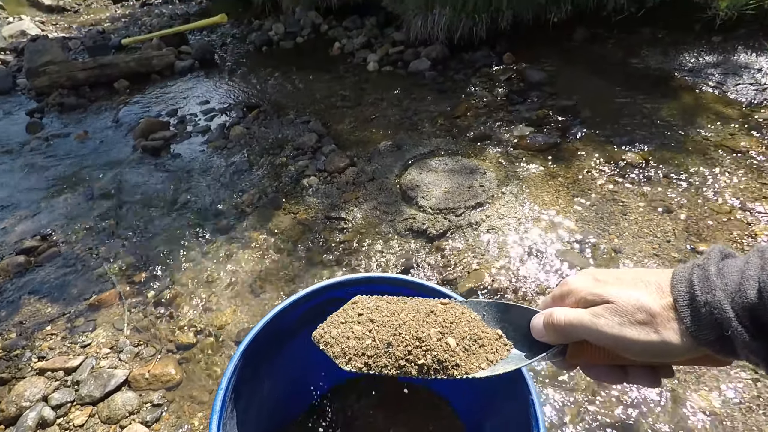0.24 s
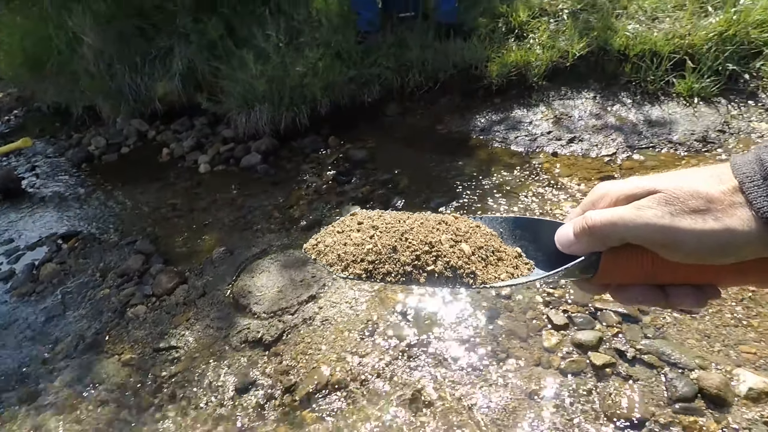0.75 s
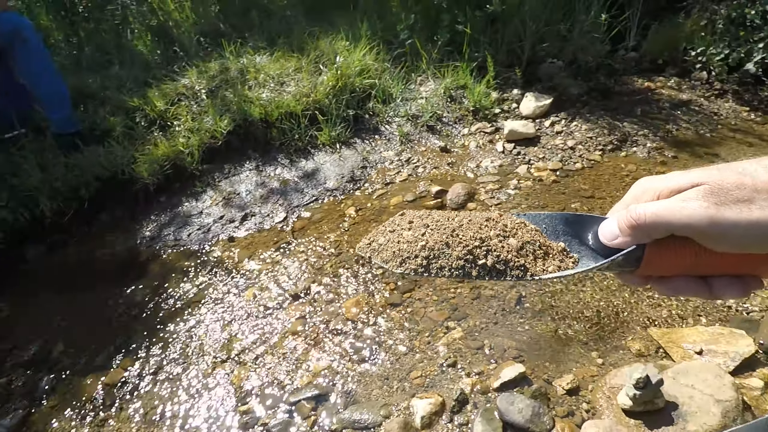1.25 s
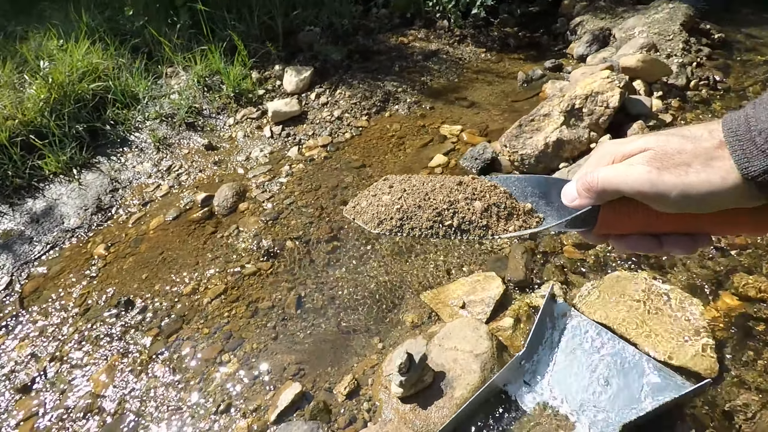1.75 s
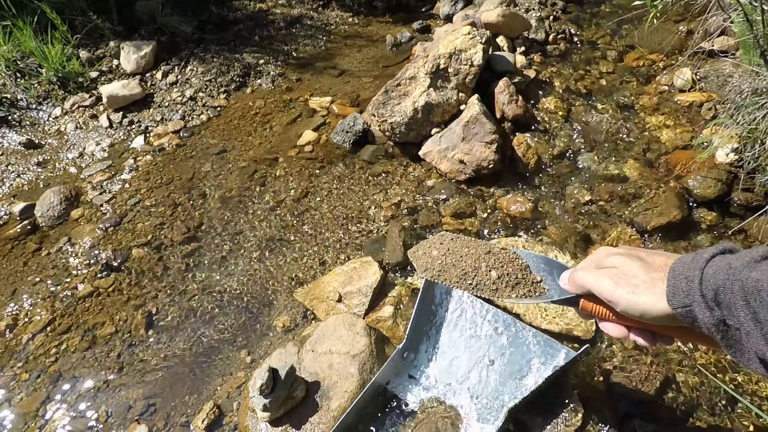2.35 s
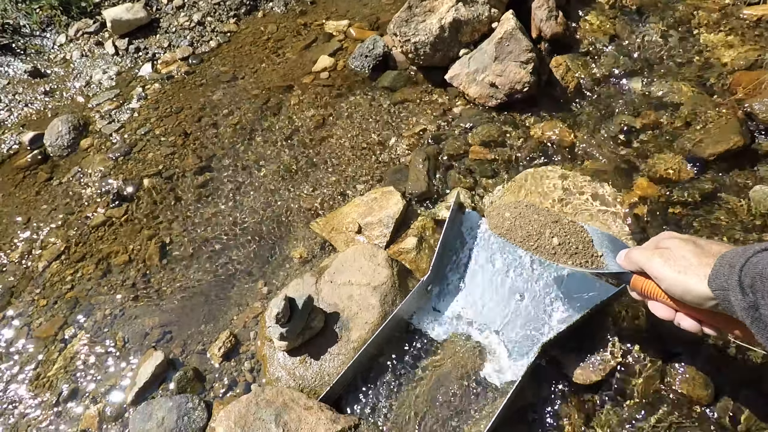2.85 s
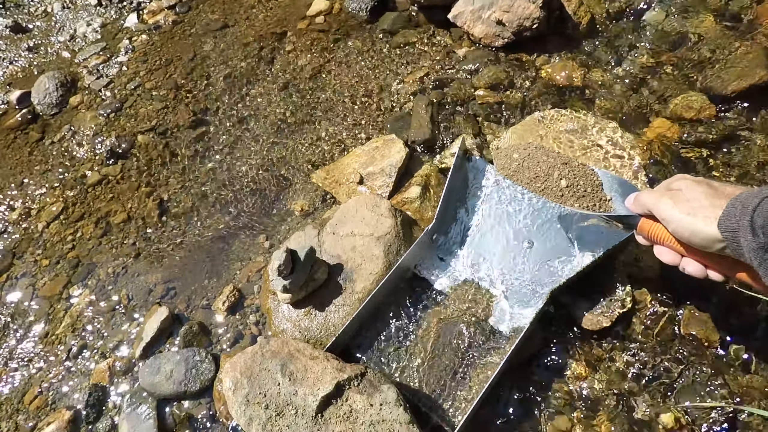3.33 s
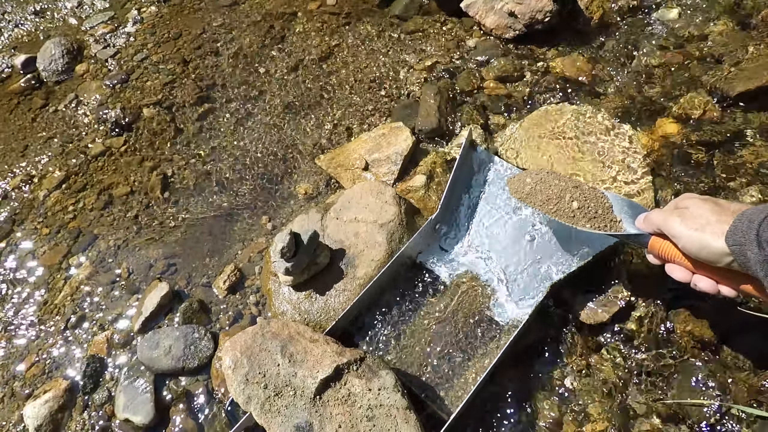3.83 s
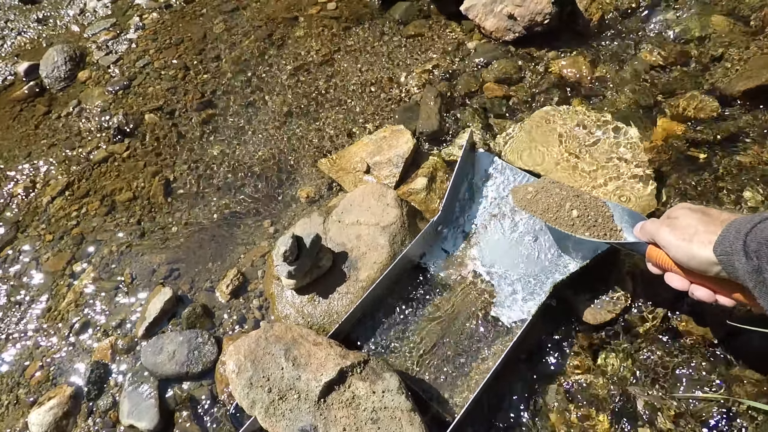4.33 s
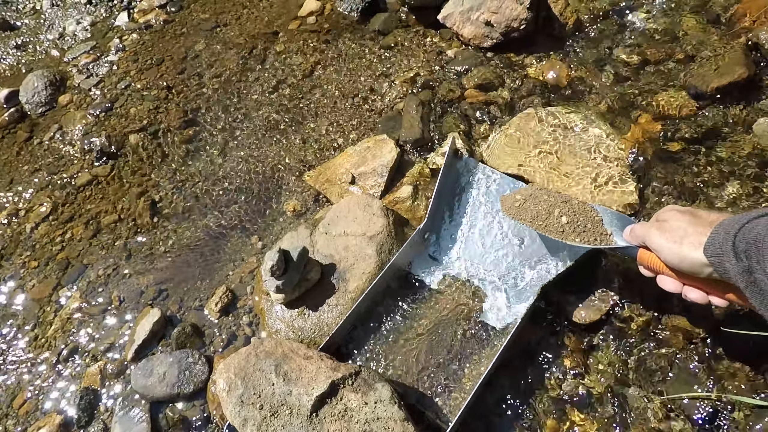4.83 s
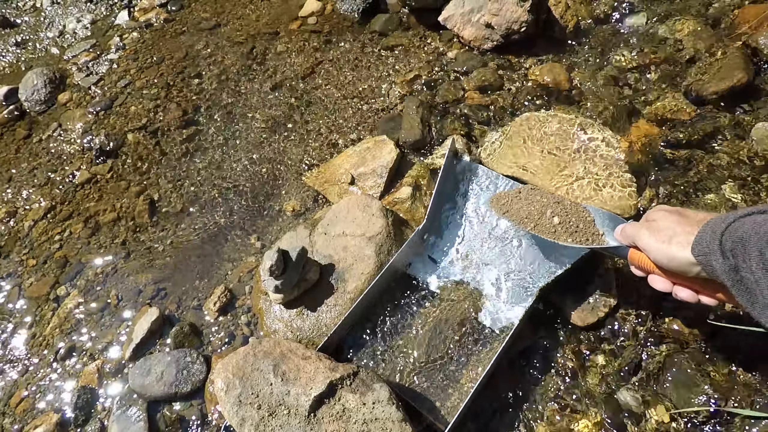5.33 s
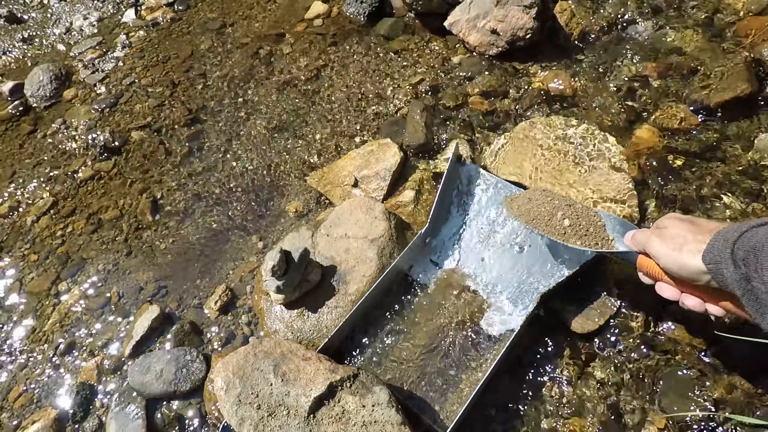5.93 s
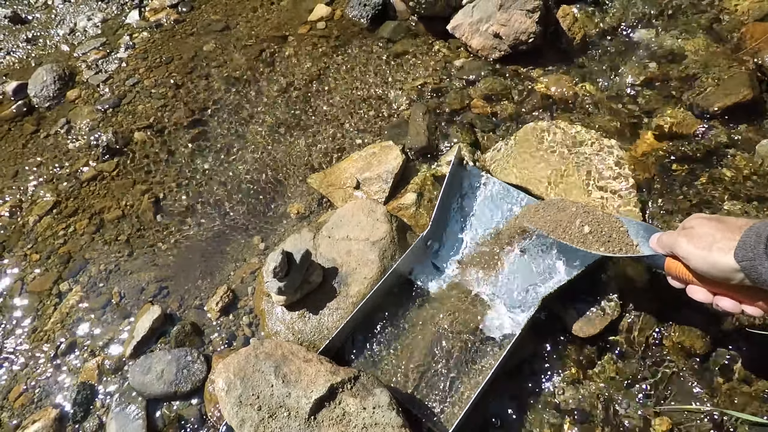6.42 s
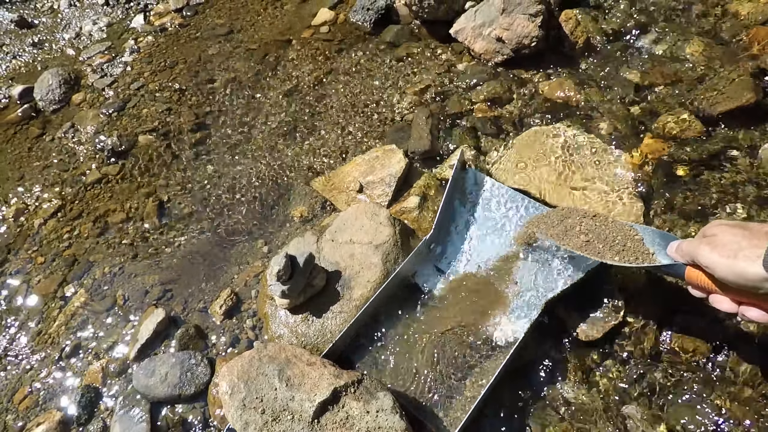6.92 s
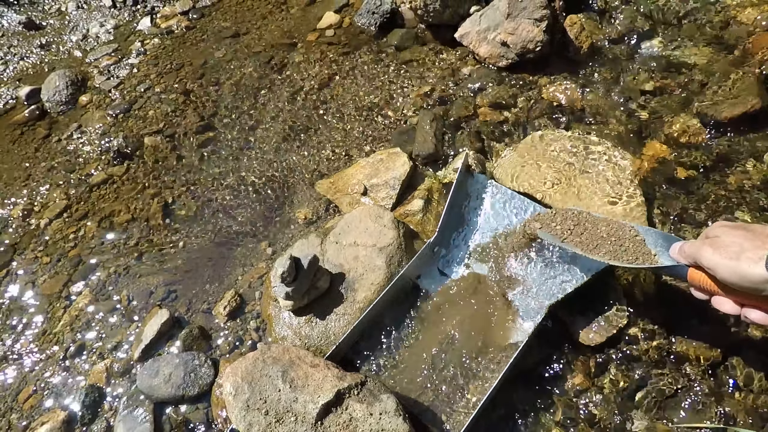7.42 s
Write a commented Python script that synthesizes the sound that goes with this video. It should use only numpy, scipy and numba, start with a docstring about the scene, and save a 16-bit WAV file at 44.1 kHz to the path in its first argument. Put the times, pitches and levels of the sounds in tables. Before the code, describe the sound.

Shallow creek water bubbles steadily through a metal sluice, with small gravel ticks and two hard bumps on the microphone.

```python
"""Creek water runs over the riffles of a metal sluice while gravel is shaken in.
Bubbles ring and glide up; splashes and grit tick over a wash of hiss. It is heard at the two ports of a
body-worn camera whose wearer turns to the sluice. The housing knocks, creaks and rubs near the right
port, a gust rumbles for a while and a thin whine sits in the treble."""
import sys
import numpy as np
from scipy import signal
from scipy.fft import rfft, irfft, next_fast_len
from scipy.io import wavfile
from scipy.ndimage import uniform_filter1d, minimum_filter1d
from numba import njit

SR = 44100
rng = np.random.default_rng(int(sys.argv[2]) if len(sys.argv) > 2 else 0)


def log_audio(samples):
    """Write samples as a 16-bit WAV file to the path given in sys.argv[1]."""
    # one column per channel
    frames = np.atleast_2d(samples).T
    # limit to full scale, then quantise
    limited = np.clip(frames, -1, 1)
    pcm = np.round(limited * 32767).astype(np.int16)
    wavfile.write(sys.argv[1], SR, pcm)


N = 338247

# nearness of the riffles: t/s, level/dB
NEARNESS = [(0.0, -58.5), (0.7, -55.5), (1.4, -55.5), (2.3, -55), (5.2, -55), (7.67, -54.5)]
# grit and spray in the treble: t/s, lift/dB
GRIT_LIFT = [(0, -2), (1.3, -4), (1.9, -2.5), (2.3, 1), (4.3, 1), (4.8, -1), (5.35, -1), (5.6, 3), (6.0, 0),
             (7.05, 4), (7.67, 4)]
# wash spectrum: f/Hz, density/dB
WASH_SPECTRUM = [(110, 2), (176, 8.5), (510, -0.5), (850, -2.5), (1040, -3.5), (1890, -6.5), (3300, -9.5),
                 (4400, -10.5), (5500, -9), (6500, -5.5), (7500, -10.5), (8300, -13), (10500, -16),
                 (12400, -22.5), (14300, -25), (15400, -45)]
# tick spectrum: f/Hz, density/dB
TICK_SPECTRUM = [(600, -50), (1000, -41), (1530, -4.5), (1900, -14), (3400, -10.5), (4200, -15.5),
                 (5500, -2.5), (6500, 1), (7500, -5.5), (8300, -19), (9500, -16), (12300, -45)]
# likeness of the ports: f/Hz, correlation/1
PORT_CORRELATION = [(60, 0.46), (130, 0.044), (290, -1.23), (640, -0.44), (1410, 0.2), (3100, 0.87),
                    (6820, 0.38), (9000, 0.3), (15000, 1)]
# water balance: f/Hz, left minus right/dB
WATER_PAN = [(60, -0.5), (110, -5.5), (200, 2.5), (380, 2.5), (700, -1.5), (1290, -2.5), (2380, -3.5),
             (4400, -1), (8120, -0.5), (15000, 0)]
# clear bubbles: t/s, level/dB, f/Hz
CLEAR_BUBBLES = [(0.835, -40.5, 1320), (1.456, -37.5, 2900), (1.695, -30, 803), (1.832, -40, 665),
                 (1.935, -34.5, 3730), (1.992, -36, 766), (2.189, -36.5, 1000), (2.234, -38, 870),
                 (2.349, -34, 1370), (2.741, -37.5, 2920), (3.026, -34, 860), (3.089, -28.5, 608),
                 (3.164, -33.5, 1450), (3.252, -39.5, 734), (3.301, -33.5, 1480), (3.36, -37.5, 854),
                 (3.434, -35.5, 896), (3.462, -33, 820), (3.636, -33, 664), (3.765, -32, 955),
                 (3.792, -31.5, 785), (3.811, -35.5, 1800), (3.897, -38.5, 2380), (4.04, -33.5, 2570),
                 (4.194, -37, 800), (4.515, -34.5, 746), (4.638, -41, 1145), (4.819, -36.5, 655),
                 (4.897, -36, 890), (4.965, -32.5, 694), (5.101, -35, 544), (5.253, -37.5, 1013),
                 (5.278, -32.5, 888), (5.41, -40, 1570), (5.459, -39, 690), (5.506, -35.5, 773),
                 (5.57, -36, 910), (5.737, -40.5, 815), (5.781, -35, 830), (5.809, -34, 2700),
                 (5.824, -40.5, 613), (5.826, -35, 2840), (5.928, -42, 880), (6.012, -31, 973),
                 (6.022, -34.5, 618), (6.079, -35.5, 790), (6.137, -30.5, 710), (6.238, -34.5, 764),
                 (6.352, -37.5, 960), (6.38, -35, 1870), (6.421, -34, 572), (6.422, -36.5, 2090),
                 (6.461, -34, 1950), (6.561, -29.5, 650), (6.655, -38, 1400), (6.702, -35.5, 2540),
                 (6.79, -35.5, 1380), (6.848, -35, 2500), (6.895, -34, 813), (6.947, -34.5, 695),
                 (7, -31.5, 1580), (7.024, -32, 2350), (7.159, -34.5, 610), (7.185, -37, 1930),
                 (7.283, -34, 1770), (7.403, -30.5, 630), (7.476, -39, 900), (7.51, -36.5, 1090),
                 (7.652, -36, 1455)]
# closing air pockets: t/s, length/s, start f/Hz, level/dB
AIR_POCKETS = [(0.892, 0.028, 935, -44.5), (1.116, 0.023, 810, -43), (3.693, 0.061, 503, -36),
               (4.034, 0.013, 1470, -40.5), (4.339, 0.027, 560, -40.5), (4.525, 0.035, 875, -45),
               (4.962, 0.0098, 2520, -38.5), (4.981, 0.045, 540, -41.5), (5.596, 0.032, 720, -36),
               (6.235, 0.012, 2480, -46)]
# tiny drops: t/s, level/dB, f/Hz
DROPS = [(1.3106, -41, 3300), (1.3448, -42.5, 2960), (2.0527, -42, 4080), (2.3281, -41, 4600),
         (2.463, -37, 3300), (3.252, -36, 3650), (3.5174, -40, 2570), (3.6721, -37, 4100),
         (3.736, -38, 3160), (3.8227, -34.5, 4040), (4.5506, -45, 3000), (4.6384, -42, 3270),
         (4.6827, -38, 3600), (4.7451, -42, 4140), (4.8469, -36.5, 3400), (5.0474, -37.5, 2730),
         (5.0844, -37, 3110), (5.1287, -42, 3710), (5.359, -45, 3000), (5.383, -43, 2800),
         (5.4859, -45, 2860), (5.5735, -33.5, 2840), (5.664, -39, 3580), (5.7455, -33.5, 2700),
         (5.8394, -41, 4610), (5.9785, -42, 3680), (6.173, -37, 2350), (6.239, -32, 2940),
         (6.298, -41, 3120), (6.347, -45, 3280), (6.48, -37, 2430), (6.5194, -44, 3930),
         (6.6553, -43, 2370), (6.7494, -53, 4290), (6.9294, -47, 4430), (6.9894, -44, 2360),
         (7.0794, -52, 4710), (7.156, -37.5, 3460), (7.237, -36, 4220), (7.3203, -43, 4170),
         (7.3494, -53, 4210), (7.4485, -38, 2760), (7.545, -40, 2920), (7.6294, -43.5, 4170)]
# splash and grit ticks: t/s, level/dB, top band re level/dB
CLEAR_TICKS = [(1.1925, -32, -25), (2.1296, -36.5, -30), (2.8105, -45, -24), (2.8419, -37, -12),
               (3.181, -36, -28), (3.2415, -37, -22), (3.4883, -36.5, -20), (3.5835, -33.5, -27),
               (3.6381, -36, -28), (3.6725, -33, -31), (4.0103, -35, -27), (4.0795, -37, -30),
               (4.0934, -39, -25), (4.1255, -41, -22), (4.1365, -37, -18), (4.1939, -36, -14),
               (4.2767, -28.5, -20), (4.3765, -39.5, -10), (4.5186, -36, -29), (4.593, -32.5, -32),
               (4.6706, -33.5, -30), (4.7591, -42, -21), (4.7855, -41, -22), (4.8479, -41, -20),
               (4.893, -37, -24), (5.3936, -35, -26), (5.4114, -34.5, -25), (5.459, -23, -22),
               (5.5014, -36, -23), (5.5674, -33, -21), (5.5825, -27.5, -22), (5.6146, -31, -27),
               (5.7003, -31, -16), (5.8591, -40, -21), (5.8755, -36, -14), (5.9209, -37, -20),
               (5.9783, -34.5, -22), (6.1315, -37, -24), (6.2986, -29.5, -28), (6.3845, -38, -21),
               (6.403, -34, -17), (6.4244, -30, -21), (6.6009, -39, -22), (6.6228, -35.5, -26),
               (6.782, -37.5, -19), (6.8187, -35, -26), (6.864, -19, -21), (6.8972, -31.5, -27),
               (6.9605, -29, -19), (7.0574, -32.5, -27), (7.1065, -33.5, -17), (7.129, -29, -18),
               (7.2145, -35.5, -22), (7.267, -32.5, -23), (7.3118, -33.5, -23), (7.3714, -39, -14),
               (7.4018, -33, -10), (7.424, -34, -24), (7.4756, -37, -18), (7.493, -34, -16),
               (7.5979, -26, -19), (7.656, -33.5, -21)]
# knocks on the housing: t/s, level/dB, nominal thud f/Hz, crack re thud/dB
HOUSING_KNOCKS = [(0.014, -26.5, 188, -35), (0.04, -21, 172, -39), (0.064, -23, 208, -35),
                  (0.148, -19, 173, -14.5), (0.547, -22, 197, -32), (0.57, -29.5, 207, -28),
                  (0.596, -31, 200, -37), (0.607, -30.5, 210, -30), (0.621, -38, 200, -30),
                  (0.715, -21.5, 226, -25), (0.895, -23.5, 215, -22), (2.514, -24.5, 217, -0.5),
                  (2.599, 7.5, 187, -16), (2.689, -21, 203, -10), (2.793, -21, 194, -10),
                  (2.864, -24, 161, -25), (2.965, 14.5, 205, -5), (3.003, 4, 158, -11.5),
                  (3.377, -28, 192, -19), (3.448, -20.5, 183, -26), (3.588, -21, 213, -24),
                  (3.599, -24.5, 180, -19), (4.396, -30, 247, -19), (4.463, -15, 248, -43),
                  (4.797, -28.5, 182, -23), (4.894, -25, 159, -19), (4.983, -23, 219, -24),
                  (5.788, -19, 243, -35), (5.863, -19, 189, -34), (5.959, -28, 205, -22),
                  (6.034, -27.5, 180, -19), (6.169, -27.5, 215, -8), (6.246, -16, 182, -28),
                  (6.331, -23, 317, -23), (6.407, -28.5, 225, -22), (6.456, -27.5, 175, -10),
                  (6.763, -17, 186, -31), (6.82, -14.5, 218, -28), (6.83, -20, 274, -12),
                  (7.057, -28, 180, -8), (7.109, -31.5, 279, -18)]
# crack modes of the shell: f/Hz, level/dB, t60/s
SHELL_MODES = [(1195, 11.5, 0.0044), (2130, -14, 0.013), (830, -28, 0.0018), (480, -16, 0.006),
               (1576, -6, 0.015), (3030, -20, 0.0019), (4440, -26, 0.0077)]
# thud colour at the left port, shaded by the housing: f/Hz, gain/dB
FAR_PORT_EQ = [(110, 13), (190, 4.5), (330, 3.5), (600, 10.5)]
# hardest jolts, felt in the body: t/s, level/dB
BODY_BUMPS = [(2.592, -33), (2.992, -10)]
# slip bursts of the mount: t/s, length/s, first level/dB, last level/dB
MOUNT_CREAKS = [(1.134, 0.039, -27.5, -21), (1.185, 0.047, -19, -14), (1.296, 0.06, -10, -17.5),
                (1.402, 0.077, -12, -25), (1.54, 0.062, -23.5, -24), (1.608, 0.014, -21, -26),
                (1.635, 0.054, -16, -19), (1.701, 0.091, -19, -33), (1.779, 0.08, -30, -20),
                (2.03, 0.015, -20, -43), (2.086, 0.045, -21.5, -24), (2.137, 0.076, -28, -13.5)]
# strap and cloth on the housing: t/s, level/dB
RUB_LEVEL = [(0.0, -48), (0.32, -51), (0.96, -49.5), (1.45, -44), (1.75, -44), (2.3, -44), (2.84, -39),
             (3.14, -47.5), (4.6, -48.5), (5.13, -53), (6.0, -51.5), (7.0, -51.5), (7.67, -50.5)]
# gust on the ports: t/s, level/dB
GUST_LEVEL = [(0.0, -61), (0.4, -71.5), (2.5, -68), (2.7, -54), (2.9, -49), (3.15, -43.5), (3.68, -45),
              (3.8, -51), (4.5, -50), (4.9, -56.5), (5.15, -66), (7.3, -76), (7.67, -84)]
# gust spectrum: f/Hz, density/dB
GUST_SPECTRUM = [(10, -13), (20, 2), (30, -1.5), (50, -1), (75, -2.5), (100, -12.5), (118, -20)]
# steady whine: f/Hz, level/dB
WHINE_TONE = [(7305, -77)]

TURN_S = 2.84  # the wearer faces the sluice by then
LEFT_RIGHT = np.array([[1], [-1]])  # pan_db is left minus right


def creek():
    """Water over the riffles: hiss, drops, bubbles and grit, in bursts and lulls."""
    near_db, grit_db = over_time(NEARNESS), over_time(GRIT_LIFT)
    splash_db = near_db + 1.6 * (near_db - near_db.max()) + 2.5 * walk(25)  # stands out when near
    spray_db = splash_db + grit_db
    spurt = walk(15)
    bubble_pan_db = -4 + 5 * (rng.random(len(CLEAR_BUBBLES)) - .5)
    return (wash(near_db, grit_db, spurt) + drops() + bubbles(splash_db, spray_db, bubble_pan_db)
            + plops(bubble_pan_db) + pockets() + ticks(spray_db, grit_db + 5 * spurt))


def wash(near_db, grit_db, spurt):
    """Half-octave bands of hiss swell together and flicker alone; grit lifts the treble."""
    out, swell = 0, walk(3.33)
    grid_hz = np.arange(1, SR / 2, 5.)
    density = lambda hz: undb(over_hz(WASH_SPECTRUM, hz))
    mid_power = np.sum(density(grid_hz[300:800]) ** 2)
    for centre_hz in 130 * 2 ** np.arange(0, 7.2, .5):
        band = lambda hz: np.cos(np.pi * np.clip(np.log2(hz / centre_hz + 1e-9), -.5, .5)) * density(hz)
        band_db = 10 * np.log10(np.sum(band(grid_hz) ** 2) / mid_power)
        port_db = LEFT_RIGHT * over_hz(WATER_PAN, centre_hz) / 2
        lift_db = (grit_db + .78 * spurt) * (centre_hz > 4000) * (.47 if centre_hz > 9000 else .75)
        out = out + undb(band_db + port_db + swell + 2.07 * walk(22) + lift_db) * hiss(band)
    return out * undb(near_db - 3.5)


def bubbles(splash_db, spray_db, pan_db):
    """Trapped air rings and glides up: clear bubbles over gurgle, fizz and spit."""
    t_s, db, hz = np.transpose(CLEAR_BUBBLES)
    t60_s = .061 * (hz / 1000) ** -.61
    glide, side = rng.random((len(t_s), 2)).T
    clear = rings(t_s, db, hz, t60_s, .447 * glide, pan_db, port_lag(hz, side - .5), rise_cycles=.28)
    shade_db = -5 * np.clip(1 - np.arange(N) / SR / TURN_S, 0, 1) ** .5  # while facing away
    gurgle = swarm(splash_db + .38 * shade_db + 8, 596, 1145, per_s=140, scatter_db=3.5, cycles=39.8)
    fizz = swarm(splash_db + shade_db + 9.5, 1163, 4210, per_s=280, scatter_db=4, cycles=23.7)
    spit = swarm(spray_db + shade_db + 3, 5010, 7460, per_s=420, scatter_db=7, cycles=18)
    return clear + gurgle + fizz + spit


def swarm(level_db, lo_hz, hi_hz, per_s, scatter_db, cycles):
    """Small bubbles in random clusters; the higher ones are slightly weaker."""
    when, pitch, size, decay, side, glide = rng.random((int(per_s * N / SR), 6)).T
    at = onsets(3 * walk(10), .9999 * when)
    hz = lo_hz * (hi_hz / lo_hz) ** pitch
    db = level_db[at] - scatter_db * np.log(1 - .93 * size) - .29 * np.log2(hz / lo_hz)
    t60_s = cycles * (.5 + decay) / hz
    pan_db = over_hz(WATER_PAN, hz) + 8 * (side - .5)
    return rings(at / SR, db, hz, t60_s, .28 * glide, pan_db, port_lag(hz, side - .5), rise_cycles=.66)


def plops(pan_db):
    """The drop that traps a clear bubble lands with a short mid click."""
    t_s, bubble_db, _ = np.transpose(CLEAR_BUBBLES)
    db = bubble_db - 14 + 3 * rng.standard_normal(len(t_s))
    t60_s = np.full(len(t_s), .052)
    return bursts((t_s * SR).astype(int), db, t60_s, pan_db, bell(2700, octaves=.78), rise_s=.00028)


def drops():
    """Each tiny drop snaps with a brief high ring."""
    return rings(*np.transpose(DROPS), t60_s=.017, glide=.16, pan_db=-4.5, lag_rad=.1, rise_cycles=.45)


def pockets(octaves_per_s=14.4):
    """Air pockets whistle upward as they close."""
    out = np.zeros((2, N))
    port_db = np.array([[-3.5], [2.5]])
    for t_s, length_s, from_hz, db in AIR_POCKETS:
        to_hz = from_hz * 2 ** (octaves_per_s * length_s)
        at, progress = int(t_s * SR), np.linspace(0, 1, int(length_s * SR))
        phase = 2 * np.pi * np.cumsum(from_hz + (to_hz - from_hz) * progress ** 1.69) / SR
        lag_rad = np.array([[0], [port_lag(from_hz, 1)]])
        envelope = undb(db + port_db) * np.sin(np.pi * progress) ** .13
        out[:, at:at + len(progress)] += envelope * np.sin(phase + lag_rad)
    return out


def ticks(spray_db, grit_db, faint_count=700, crackle_count=500):
    """Clear splash and grit ticks amid faint ones and fine crackle, denser as more grit falls."""
    t_s, clear_db, top_db = np.transpose(CLEAR_TICKS)
    clear_at, clear_count = (t_s * SR).astype(int), len(t_s)
    clear_t60_s = .019 + .001 * (clear_db + top_db + 63.5)  # more top, longer ring
    density_db = .4 * grit_db

    when, size, decay, side = rng.random((faint_count + clear_count, 4)).T
    at = onsets(density_db, when[:faint_count])
    db = np.r_[clear_db - 3.5, spray_db[at] + 1.5 - 4.5 * np.log(1 - .97 * size[:faint_count])]
    t60_s = np.r_[clear_t60_s, .013 * (.6 + decay[:faint_count])]
    colour = lambda hz: undb(over_hz(TICK_SPECTRUM, hz))
    patter = bursts(np.r_[clear_at, at], db, t60_s, .5 + 5 * (side - .5), colour, rise_s=.0001)

    when, size, decay, side = rng.random((crackle_count + clear_count, 4)).T
    at = onsets(density_db, when[clear_count:])
    db = np.r_[clear_db + top_db, spray_db[at] - 29 - 9 * np.log(1 - .99 * size[clear_count:])]
    t60_s = np.r_[clear_t60_s, .0066 * (.5 + decay[clear_count:])]
    top_band = lambda hz: np.exp(-.5 * ((hz - 11500) / 2600) ** 4)
    crackle = bursts(np.r_[clear_at, at], db, t60_s, 8 * (side - .5), top_band, rise_s=.00081)
    return patter + crackle


def turn(water, wide_db=5, narrow_db=-.5, spray_pan_db=4.5):
    """As the wearer turns to the sluice the midrange narrows and the spray moves left."""
    turned = np.clip(np.arange(N) / SR / TURN_S, 0, 1) ** 4
    side = shaped((water[0] - water[1]) / 2, bell(1050, octaves=2.2))
    spray = shaped(water, bell(7600, octaves=.17))
    side_gain = undb(wide_db + (narrow_db - wide_db) * turned)
    spray_gain = undb(LEFT_RIGHT * spray_pan_db / 2 * turned)
    return water + LEFT_RIGHT * (side_gain - 1) * side + (spray_gain - 1) * spray


def knocks(t_s, db, hz, crack_db, pan_db, rise_cycles, jolt_above_db=-5):
    """A blow rings the shell with a crack, then thuds with sagging pitch; jolts push, taps pull."""
    hard = db > jolt_above_db
    jolts = rings(t_s[hard] + .00218, db[hard], 1.3 * hz[hard], t60_s=.02, glide=-1.03,
                  pan_db=pan_db, lag_rad=.94, rise_cycles=.45)
    taps = rings(t_s[~hard] + .00258, db[~hard], 1.155 * hz[~hard], t60_s=.021, glide=-.5,
                 pan_db=pan_db, lag_rad=1.5, rise_cycles=rise_cycles)
    left, right = jolts - taps
    out = np.array([shaped(left, lambda hz: undb(over_hz(FAR_PORT_EQ, hz))), right])
    for mode_hz, mode_db, t60_s in SHELL_MODES:
        out += rings(t_s + .00182, db + crack_db + mode_db, mode_hz, t60_s, glide=.11,
                     pan_db=1, lag_rad=-2.07, rise_cycles=.98)
    return out


def boom():
    """The two hardest jolts boom in the body."""
    return rings(*np.transpose(BODY_BUMPS), hz=59.3, t60_s=.13, glide=-.31,
                 pan_db=-2.7, lag_rad=.41, rise_cycles=.33)


def creak(slips_per_s=92.4, thud_hz=185):
    """The mount sticks and slips: bursts of small thuds at an uneven rate."""
    t_s, length_s, first_db, last_db = np.transpose(MOUNT_CREAKS)[:, :, None]
    timing, size, pitch = rng.standard_normal((len(MOUNT_CREAKS), 16, 3)).transpose(2, 0, 1)
    gap_s = np.exp(.17 * timing) / slips_per_s
    since_s = np.cumsum(gap_s, axis=1) - gap_s[:, :1]
    on = since_s <= length_s
    db = first_db + (last_db - first_db) * since_s / length_s + 2 * size
    hz = thud_hz * np.exp(.18 * pitch)
    return knocks((t_s + since_s)[on], db[on], hz[on], crack_db=-44, pan_db=-13.5, rise_cycles=.51)


def rub():
    """Strap and cloth rub the housing: a dull uneven grumble, stronger on the right."""
    noise = shaped(rng.standard_normal((3, N)), lambda hz: 1 / (1 + (hz / 300) ** 3))
    grumble = (noise[:2] + .5 * noise[2]) / np.std(noise)
    return undb(over_time(RUB_LEVEL) + 4.8 * walk(40) + np.array([[-4], [1]])) * grumble


def gust():
    """Wind on the ports: a fluttering rumble, partly shared by both."""
    noise = shaped(rng.standard_normal((3, N)), lambda hz: undb(over_hz(GUST_SPECTRUM, hz)) * (hz < 120))
    rumble = (1.03 * noise[:2] + noise[2]) / np.std(noise)
    return undb(over_time(GUST_LEVEL) + 1.5 * walk(8.3) + np.array([[-1.5], [1]])) * rumble


def whine():
    """A thin steady tone, left only."""
    (hz, db), = WHINE_TONE
    return np.sqrt(2) * undb(db) * np.sin(2 * np.pi * hz * np.arange(N) / SR) * np.array([[1.4], [0]])


def undb(db):
    """dB to gain."""
    return 10 ** (np.asarray(db) / 20)


def over_time(table):
    """A (t/s, value) table read at every sample."""
    return np.interp(np.arange(N) / SR, *np.transpose(table))


def over_hz(table, hz):
    """A (f/Hz, value) table read on a log axis."""
    table_hz, values = np.transpose(table)
    return np.interp(np.log(hz + 1e-9), np.log(table_hz), values)


def bell(centre_hz, octaves):
    """Gaussian gain curve on a log axis."""
    return lambda hz: np.exp(-.5 * (np.log2(hz / centre_hz + 1e-9) / octaves) ** 2)


def shaped(x, gain):
    """Linear-phase filter; gain is a function of Hz."""
    size = next_fast_len(N + 4096)
    return irfft(rfft(x, size) * gain(np.arange(size // 2 + 1) * SR / size), size)[..., :N]


def walk(rate_hz):
    """Random held levels, smoothed twice; spread near 1."""
    hold = int(SR / rate_hz)
    steps = np.repeat(rng.standard_normal(N // hold + 1), hold)
    return 1.3 * uniform_filter1d(uniform_filter1d(steps, hold), hold)[:N]


def onsets(density_db, draws):
    """Uniform draws to sample indices, crowded where the density is high."""
    share = np.cumsum(undb(density_db))
    return np.searchsorted(share, draws * share[-1])


def port_lag(hz, side):
    """Phase/rad between the ports, from their correlation at this pitch."""
    return np.sign(side) * np.arccos(np.clip(over_hz(PORT_CORRELATION, hz), -1, 1))


def hiss(colour):
    """Coloured noise, partly correlated between the ports; mean power 1."""
    correlation = lambda hz: np.clip(over_hz(PORT_CORRELATION, hz), -.9, .7)
    mid = shaped(rng.standard_normal(N), lambda hz: colour(hz) * np.sqrt(1 + correlation(hz)))
    side = shaped(rng.standard_normal(N), lambda hz: colour(hz) * np.sqrt(1 - correlation(hz)))
    pair = np.array([mid + side, mid - side])
    return pair / np.sqrt(np.mean(pair ** 2))


def bursts(starts, db, t60_s, pan_db, colour, rise_s):
    """Noise bursts with fast rise and exponential decay, summed in power."""
    power = np.zeros((2, N + SR // 10))
    for at, level_db, decay_s, pan in zip(starts, db, t60_s, pan_db):
        i = np.arange(int(decay_s * SR))
        envelope = 1000. ** (-i / (decay_s * SR)) * (1 - np.exp(-i / (rise_s * SR)))
        power[:, at + i] += (undb(level_db + LEFT_RIGHT * pan / 2) * envelope) ** 2
    return np.sqrt(power[:, :N]) * hiss(colour)


def rings(t_s, db, hz, t60_s, glide, pan_db, lag_rad, rise_cycles):
    """One damped sine an event; pitch moves by the fraction glide over t60_s."""
    columns = np.broadcast_arrays(t_s, db, hz, t60_s, glide, pan_db, lag_rad)
    t_s, db, hz, t60_s, glide, pan_db, lag_rad = (1. * column for column in columns)
    left, right = undb(db + pan_db / 2), undb(db - pan_db / 2)
    return sum_rings((t_s * SR).astype(np.int64), hz, t60_s, glide, left, right, lag_rad, rise_cycles)


@njit
def sum_rings(starts, hz, t60_s, glide, left, right, lag_rad, rise_cycles):
    """Sample loop of rings; lag_rad shifts the right port's phase."""
    out = np.zeros((2, N))
    for e, at in enumerate(starts):
        count, phase = int(t60_s[e] * SR), 0.
        for i in range(min(count, N - at)):
            phase += 2 * np.pi * hz[e] * (1 + glide[e] * i / count) / SR
            envelope = np.exp(-np.log(1000) * i / count) * (1 - np.exp(-i * hz[e] / (rise_cycles * SR)))
            out[0, at + i] += left[e] * envelope * np.sin(phase)
            out[1, at + i] += right[e] * envelope * np.sin(phase + lag_rad[e])
    return out


def scene(cut_hz=114.2, cut_db=-59):
    """Water and housing pass a steep bass cut that rings around each knock; the rest bypasses it."""
    water = turn(creek())
    housing = knocks(*np.transpose(HOUSING_KNOCKS), pan_db=-15.5, rise_cycles=.37) + creak() + rub()
    bass_cut = lambda hz: undb(cut_db / (1 + (hz / cut_hz) ** 14))
    return shaped(water + housing, bass_cut) + boom() + gust() + whine()


def record(dry, limit=.92, release_s=.019, top_hz=15500):
    """A limiter holds the loudest knocks down; a low-pass cuts the top."""
    peak = -minimum_filter1d(-np.abs(dry).max(axis=0), size=200)
    needed_log_gain = np.log(np.minimum(1, limit / (peak + 1e-9)))
    pole = np.exp(-1 / (release_s * SR))
    release_tail = signal.lfilter([3 * (1 - pole)], [1, -pole], needed_log_gain)
    gain = np.exp(uniform_filter1d(np.minimum(needed_log_gain, release_tail), size=100))
    return signal.sosfilt(signal.ellip(10, .2, 70, top_hz, fs=SR, output="sos"), dry * gain)


dry = scene()
out = record(dry)
log_audio(out)
```